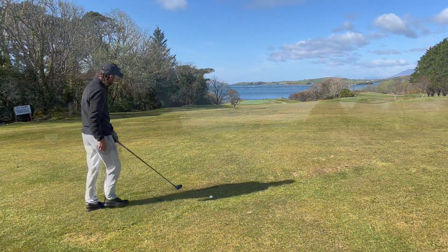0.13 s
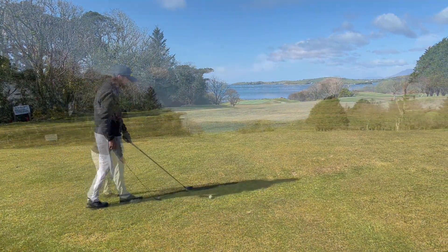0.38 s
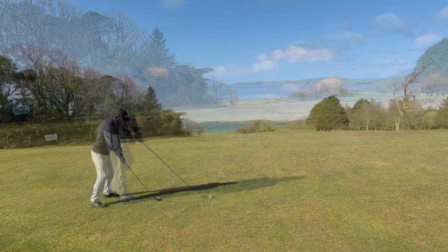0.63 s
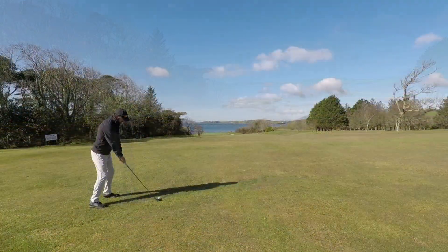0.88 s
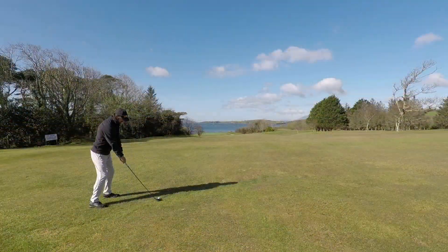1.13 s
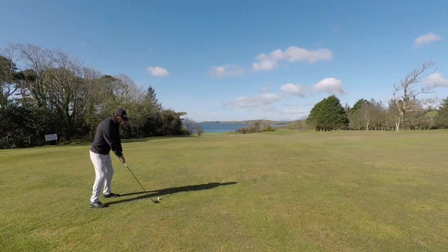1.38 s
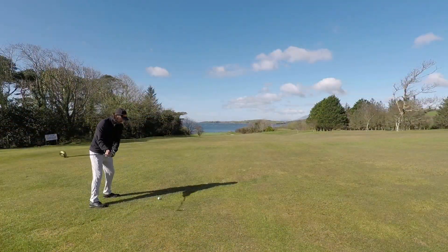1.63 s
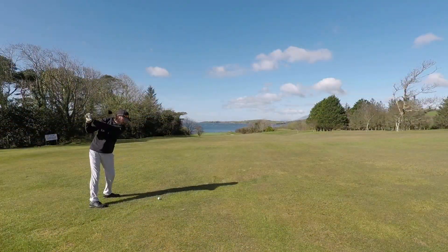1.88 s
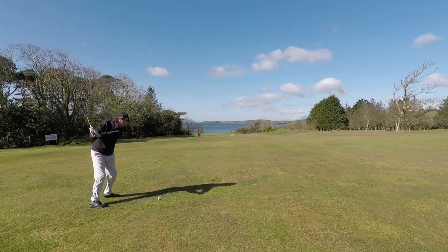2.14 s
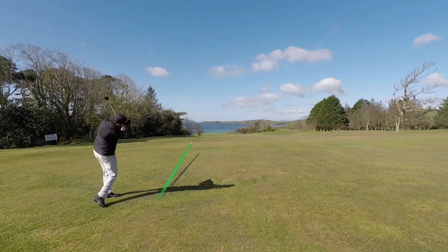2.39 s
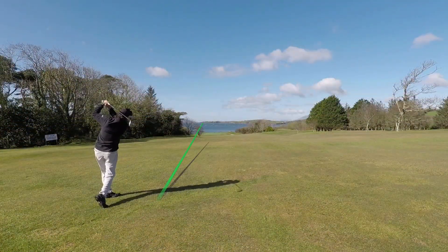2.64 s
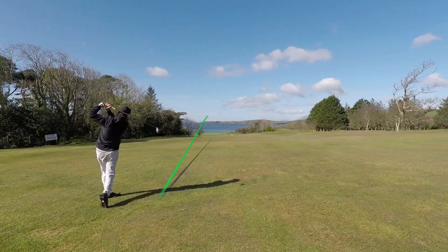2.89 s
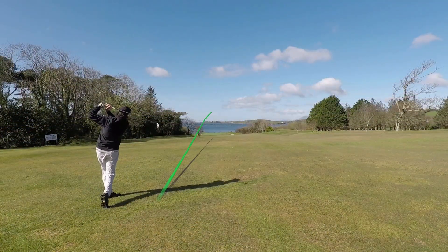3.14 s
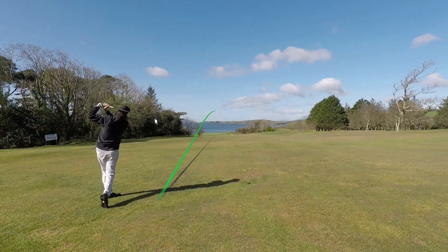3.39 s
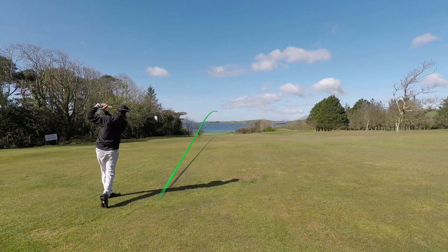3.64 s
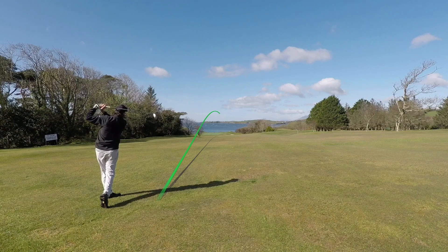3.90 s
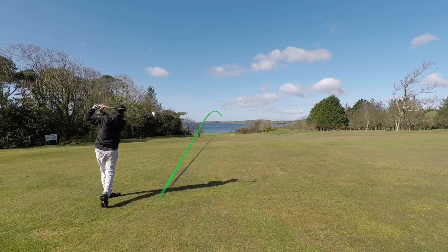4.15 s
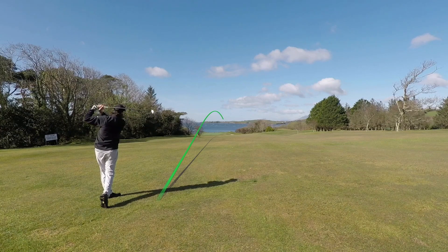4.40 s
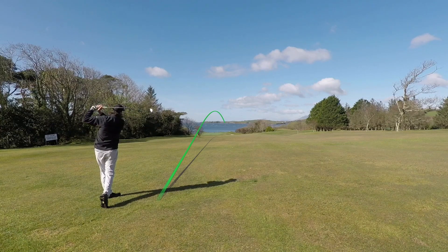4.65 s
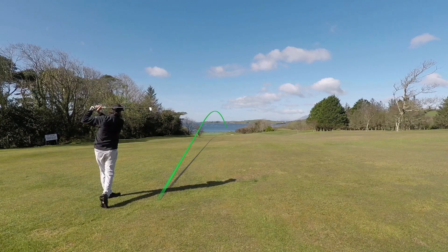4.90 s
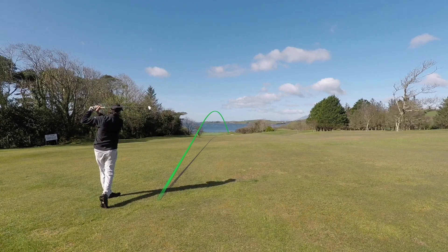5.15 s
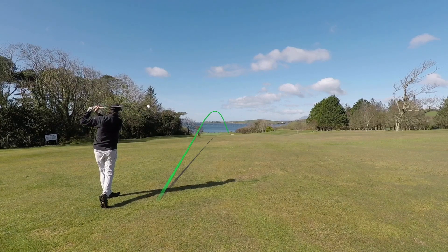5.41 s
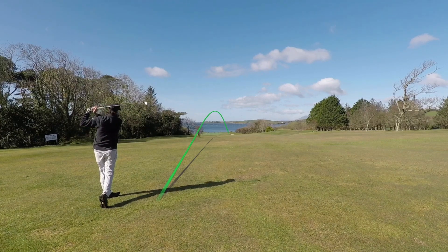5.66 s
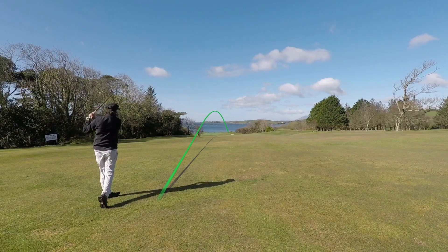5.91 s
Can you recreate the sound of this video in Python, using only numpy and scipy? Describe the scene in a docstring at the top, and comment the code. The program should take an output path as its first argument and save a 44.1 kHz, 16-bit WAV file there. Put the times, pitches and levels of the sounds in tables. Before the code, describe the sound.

Outdoors on open grass, a faint hiss of far water and leaves fades in over low rumble. Wind bumps the close stereo microphone with a blunt thud and short low flutters. A club swishes down and hits a ball with one very short, bright metallic crack, followed by a soft follow-through whoosh and tiny ticks. Later a distant bird chirps, a second wind thump lands, and the bird returns.

```python
"""Golf swing on windy open grass

A club swishes down and strikes a ball a few metres from a small stereo camera: shaped noise, then ringing modes.
Pressure steps shove its microphone twice, short low tone bursts ripple and buffet; strong bass opens a low cut
that slowly closes. Shaped noise makes the far water and leaves, which fade in over a low rumble and a hum;
gliding sines make a small bird far off."""
import sys
import numpy as np
from scipy import signal
from scipy.fft import rfft, irfft, next_fast_len
from scipy.io import wavfile
from scipy.ndimage import uniform_filter1d, map_coordinates

SR = 44100
rng = np.random.default_rng(int(sys.argv[2]) if len(sys.argv) > 2 else 0)


def amplitude_ratio(level_db):
    """Convert a level in decibels to the matching linear amplitude (field) ratio."""
    exponent = np.asarray(level_db, float) / 20
    return 10 ** exponent


def pcm_store(signal):
    """Save signal as 16-bit PCM."""
    levels = np.round(np.clip(np.atleast_2d(signal), -1, 1) * 32767)
    wavfile.write(sys.argv[1], SR, levels.astype(np.int16).T)


N = 266055
T = np.arange(N) / SR
STRIKE_S = 2.3513

# noise of head, grass and ticks: freq_hz [Hz], shape_db [relative dB per Hz]
SWISH_SPECTRUM = [(600, -33.5), (1500, -2), (3000, -6), (6500, -4.5), (9000, -11.5), (14000, -28.5),
                  (16000, -63)]
# wind shoves on the microphone: start_s [s], drop [pressure, share of full scale],
# return_s [s after the start], let_go_s [s after the start], last_swell [share of the drop]
WIND_SHOVES = [(1.6415, .68, .053, .080, .2), (4.8893, .88, .047, .0935, .43)]


def unit(x):
    """Scaled to rms 1."""
    return x / np.sqrt(np.mean(x ** 2) + 1e-20)


def along(points, hz):
    """Values of (Hz, value) points, read along a log axis."""
    f, v = np.transpose(points)
    return np.interp(np.log(hz + 1), np.log(f + 1), v)


def wobble(rate):
    """A smooth random curve, rate knots a second."""
    return map_coordinates(rng.standard_normal(int(N * rate / SR) + 4), [T * rate])


def swell(peak_s, level_db, ten_db_down_s):
    """A bell-shaped level in dB, 10 dB down at the given time either side of its peak."""
    return level_db - 10 * ((T - peak_s) / ten_db_down_s) ** 2


def decay(start_s, level_db, t60_s):
    """Amplitude that holds until start_s, then dies by 60 dB in t60_s."""
    return amplitude_ratio(level_db - 60 * np.maximum(T - start_s, 0) / t60_s)


def filtered(x, response):
    """x times a complex response of frequency."""
    m = next_fast_len(N + SR // 2)
    return irfft(rfft(x, m) * response(np.fft.rfftfreq(m, 1 / SR)), m)[..., :N]


def rush(spectrum, patchy_db):
    """Stereo noise with patches of random gain; the mid has rms 1."""
    # likeness of the ports: freq_hz [Hz], likeness [correlation, limited below]
    likeness = [(60, 0.84), (120, 0.29), (240, -0.21), (480, -0.61), (950, -0.83), (1890, -0.27),
                (3770, 0.12), (7520, 0.92), (15000, 0.95)]
    z = signal.stft(rng.standard_normal((2, N)), nperseg=512)[2]
    field = uniform_filter1d(rng.standard_normal(z.shape[1:]), size=6, axis=0)
    field = uniform_filter1d(field, size=14, axis=1)
    pair = signal.istft(z * amplitude_ratio(patchy_db * unit(field)), nperseg=512)[1][:, :N]

    def mid_and_side(hz):
        side_share = np.tan(np.arccos(np.clip(along(likeness, hz), -.9, .99)) / 2)
        return amplitude_ratio(along(spectrum, hz)) * [hz ** 0, side_share]

    mid, side = filtered(pair, mid_and_side)
    return np.array([mid + side, mid - side]) / np.std(mid)


def eddies():
    """Random stereo swing of rms 1, partly shared by the ports, that broadens a tone into a whistle."""
    return unit(np.array([wobble(750), wobble(750)]) + 1.2 * wobble(750))


def air():
    """Deep rumble, a far mains hum, the low rush of wind and the smooth hiss of far water and leaves."""
    # spectra of rumble, low wind and far hiss: freq_hz [Hz], shape_db [relative dB per Hz]
    rumble_spectrum = [(4, -20), (12, 1.5), (28, 1.5), (50, -2), (90, -4), (130, -16), (165, -24),
                       (220, -62), (400, -120)]
    wind_spectrum = [(71, -17.5), (120, 2), (183, -1.5), (246, -5), (350, -9.5), (900, -24), (1170, -48.5),
                     (1980, -120)]
    far_spectrum = [(240, -29.5), (400, -6), (742, -7), (801, -7), (1490, -8.5), (1600, -8.5),
                    (2090, -12.5), (5270, -20), (7280, -15), (9920, -16), (14800, -28.5), (16000, -48.5)]
    # low wind before its small random wavering: time_s [s], level_db [dB rms of the mid]
    wind_level = [(0, -51.5), (1.0, -55.5), (1.35, -52.5), (2.3, -50.5), (2.55, -54), (6.03, -54)]
    # hum before its wavering: freq_hz [Hz], level_db [dB rms]
    hum_tones = [(59.9, -46.5), (120, -63)]
    fade_s, fade_power, floor = 0.76, 1.78, amplitude_ratio(-24.5)
    fade = np.clip(T / fade_s, 0, 1) ** fade_power * (1 - floor) + floor
    rumble = amplitude_ratio(-48.5 + 1.0 * wobble(8.4)) * rush(rumble_spectrum, patchy_db=1)
    hum = 0
    for hz, db in hum_tones:
        level = np.sqrt(2) * amplitude_ratio(db + 3 * wobble(10))
        hum = hum + level * np.sin(2 * np.pi * hz * T + 0.7 * wobble(6))
    low_db = np.interp(T, *np.transpose(wind_level))
    low = amplitude_ratio(low_db + 0.75 * wobble(4.46)) * rush(wind_spectrum, patchy_db=1)
    far = amplitude_ratio(-58) * rush(far_spectrum, patchy_db=0.5)
    # a band near 900 Hz dies away from the start
    band = [(400, -20), (550, -7), (850, -3.5), (1100, -4.5), (1800, -15), (2400, -47)]
    fading = amplitude_ratio(-68.5 - 14 * T) * rush(band, patchy_db=1.0)
    return np.clip(T / 0.024, 0, 1) * (rumble + hum) + fading + fade * (low + far)


def brief_hiss():
    """A short narrow hiss: a high tone broadened by random swings in level."""
    level = np.sqrt(2) * amplitude_ratio(swell(peak_s=0.68, level_db=-65, ten_db_down_s=.05))
    return level * eddies() * np.sin(2 * np.pi * 6540 * T)


def low_bursts():
    """A faint low ripple just before the first shove, then short low bursts: rough tones under bells."""
    # bursts: time_s [s], level_db [dB peak of the smooth part before panning], freq_hz [Hz], length_s [s]
    burst_rows = [(1.608, -29, 202, 0.022), (1.953, -27, 300, 0.0086), (1.964, -14, 171, 0.013),
                  (1.981, -19, 205, 0.023), (2.022, -30.5, 177, 0.044), (2.159, -24.5, 120, 0.046),
                  (2.18, -20, 134, 0.014), (2.196, -20, 165, 0.02), (2.283, -37, 250, 0.017),
                  (2.33, -25.5, 194, 0.015)]
    edge = [(150, -18.0), (300, 13), (600, -7.5), (1100, -25.0), (2000, -58.5)]  # (Hz, relative dB per Hz)
    rough = amplitude_ratio(-21.5) * rush(edge, patchy_db=3.5)[0]
    out = 0
    for s, db, hz, length in burst_rows:
        phase = rng.uniform(-0.66, 0.45)
        bell = np.exp(-(3.54 * (T - s) / length) ** 2)
        out = out + amplitude_ratio(db) * bell * (np.cos(2 * np.pi * hz * (T - s) + phase) + rough)
    return out * [[1], [-.18]]  # a little, inverted, in the second channel


def shoves():
    """Pressure steps leak away behind the diaphragm; the right port feels them first, the cover flaps."""
    # steps as a shove lets go: delay_s [s], share [of the pressure regained], rise_s [s]
    letting_go = [(0, -.24, .0012), (.0025, .1, .002), (.0065, -.5, .005)]
    # the port cover flutters on: start_s [s], level_db [dB peak], freq_hz [Hz]
    flutters = [(1.655, -22, 200), (4.9052, -14.5, 149)]
    return_share = .44
    steps = []  # (s, size, rise s)
    flaps = [(s, db, hz, 0.068, -52) for s, db, hz in flutters]  # (s, flap dB, Hz, t60 s, rustle dB)
    for s, drop, back, held, last in WIND_SHOVES:
        end = s + held
        steps += [(s, -drop, .001), (s + back, drop * return_share, .016)]
        steps += [(end - .010, drop * last, .014)]  # the last swell
        regained = drop * (return_share + last)
        steps += [(end + lag, regained * share, rise) for lag, share, rise in letting_go]
        flaps += [(s + .002, -10, 140, .02, -37), (end - .011, -34, 250, .03, -46)]
    push = sum(size * (.5 + .5 * np.tanh(2 * (T - s) / rise)) for s, size, rise in steps)

    def leak(hz):
        # a 22 ms leak applied to the slope of the push; the left port lags by 0.4 ms
        lag = np.exp(-2j * np.pi * hz * np.array([[.0004], [0]]))
        return SR * lag / (1 / .022 + 2j * np.pi * hz)

    pressure = filtered(np.diff(push, prepend=0), leak)
    # the ports snap as a shove lands, the right one hardest
    snap = sum(amplitude_ratio(-9.5) * np.exp(-((T - s + 0.00028) / .00014) ** 2) for s, *_ in WIND_SHOVES)
    flap, rustle_level = 0, 0
    for s, db, hz, t60, rustle_db in flaps:
        tone = np.sin(2 * np.pi * hz * (T - s))
        flap = flap + decay(s, db, t60) * tone * np.clip((T - s) / 0.0004, 0, 1)
        rustle_level = rustle_level + decay(s, rustle_db, 0.082) * np.clip((T - s) / 0.0012, 0, 1)
    cloth = [(150, -11), (350, 0), (1500, -6.5), (3500, -21.0), (6000, -57), (9000, -90)]  # (Hz, dB per Hz)
    rustle = rustle_level * rush(cloth, patchy_db=1.0)
    return pressure + snap * [[.1], [1]] + flap + rustle


def sway():
    """The camera mount rings low and long once a shove lets go, by a share of its last swell."""
    out = 0
    for s, drop, _, held, last in WIND_SHOVES:
        t = np.maximum(T - s - held, 0)
        level = .045 * drop * last * amplitude_ratio(-60 * t / 17 + 1.0 * wobble(6))
        out = out + level * np.sin(2 * np.pi * 23.15 * t)
    return out


def ticks():
    """Bits of turf and clothing tick: bursts of noise that start at once and die fast."""
    # ticks: time_s [s], level_db [dB at the onset, before the 0.44 below]
    tick_rows = [(1.829, -42), (2.475, -47), (2.523, -40.5), (2.6994, -52)]
    level = sum(decay(s, db, 0.018) * (T >= s) for s, db in tick_rows)
    return 0.44 * level * rush(SWISH_SPECTRUM, patchy_db=0)


def swing():
    """The shaft sheds eddies in a broad whistle that rises with speed; head and grass hiss."""
    downswing_s, top_whistle_hz, follow_hz = .18, 890, 1440
    since = T - STRIKE_S
    speed = np.clip(1 + since / downswing_s, 1e-3, 1)  # gathers evenly up to full speed at the blow
    hz = np.where(since < 0, top_whistle_hz * speed, follow_hz)
    level = amplitude_ratio(swell(peak_s=2.31, level_db=-46.5, ten_db_down_s=.04))
    level = level + amplitude_ratio(swell(peak_s=2.67, level_db=-64.5, ten_db_down_s=.15))  # follow-through
    whistle = np.sqrt(2) * level * eddies() * np.sin(2 * np.pi * np.cumsum(hz) / SR)
    # the hiss grows 42.5 dB per decade of speed and falls 702 dB a second after the blow
    hiss = amplitude_ratio(-48 + 42.5 * np.log10(speed) - 702 * np.maximum(since, 0))
    hiss = hiss + amplitude_ratio(swell(peak_s=2.593, level_db=-58, ten_db_down_s=0.17))  # follow-through
    return whistle + hiss * rush(SWISH_SPECTRUM, patchy_db=0)


def strike():
    """The blow rings the modes of head and ball; turf, player and surroundings answer at once."""
    # club head and ball: freq_hz [Hz], level_db [dB before the gain of the blow], t60_s [s],
    # pan_db [dB left over right], left_lead_rad [radians left ahead of right]
    head_modes = [(300, -27.5, 0.0275, 9, 3.5), (756, -12, 0.0052, 9.5, 4), (1340, -13, 0.0067, -10, 2.5),
                  (1625, -2.5, 0.0076, -9.5, 1), (1910, -6, 0.0076, 11.5, -1), (2225, -12, 0.0097, 2, 3),
                  (2580, -15.5, 0.012, 6.5, 3.5), (4100, -16.5, 0.016, 0, 1.43),
                  (4650, -26.5, 0.0067, 0, 4.5), (5100, -21.5, 0.021, 5, 3), (5950, -5.5, 0.022, 0, 0.33),
                  (5880, -20.5, 0.041, -4, 0.7), (6040, -24, 0.077, 0.5, -1.5), (6250, -15.5, .012, -2, 3),
                  (6560, -15, 0.048, 8.5, 1.65), (6650, -29, 0.04, 1.5, 0), (7060, -21.5, 0.043, -4.5, 1.5),
                  (7950, -21.5, 0.035, 4, 0.5), (8230, -23, 0.0253, -3, 0.5), (8550, -11.5, .02, -2, 3.5),
                  (10500, -19.5, 0.015, -7, 4.5), (13350, -22.5, 0.0079, -8, -0.5)]
    # off the turf and the player: delay_s [s], level_db [dB relative to the direct sound]
    bounces = [(.0027, -20), (.0042, -18)]
    # scatter around the tee: freq_hz [Hz], t60_s [s]
    scatter_t60 = [(300, 0.031), (2000, 0.028), (8000, 0.07), (15000, 0.037)]
    first = int(STRIKE_S * SR) + 1
    t = T[first:first + SR // 4] - STRIKE_S
    ear = np.array([[.5], [-.5]])  # left, right
    ring = 0
    for hz, db, t60, pan_db, lead in head_modes:
        level = amplitude_ratio(db + ear * pan_db - 60 * t / t60)
        ring = ring - level * np.sin(2 * np.pi * hz * t + ear * lead)
    crack_spectrum = [(500, -21), (3000, 4.5), (9000, 0.0), (15000, -22), (16500, -60)]  # (Hz, dB per Hz)
    crack = amplitude_ratio(-17.5 - 60 * t / 0.015) * rush(crack_spectrum, patchy_db=-4.0)[:, :len(t)]
    direct = amplitude_ratio(-2.14) * (ring + crack) * (1 - np.exp(-t / 0.00018))
    near = direct + sum(amplitude_ratio(db) * np.roll(direct, round(lag * SR), axis=1) for lag, db in bounces)
    # scattered tail: noise that dies at its own pace in each band
    hz, u, z = signal.stft(rng.standard_normal((2, SR // 4)), SR, nperseg=128)
    tail = signal.istft(z * amplitude_ratio(-60 * u / along(scatter_t60, hz)[:, None]), SR, nperseg=128)[1]
    tail = tail / np.linalg.norm(tail[0])
    near = near + amplitude_ratio(-13) * signal.fftconvolve(direct, tail, axes=1)[:, :len(t)]
    return np.pad(near, ((0, 0), (first, N - first - len(t))))


def bird():
    """Short gliding whistles and one warble, far off and smeared by the trees."""
    # clear notes: start_s [s], length_s [s], from_hz [Hz], to_hz [Hz], level_db [dB peak before panning]
    clear_notes = [(4.139, .025, 3780, 3580, -58), (4.213, .022, 3600, 3300, -60),
                   (4.26, .026, 3300, 4050, -54), (4.37, 0.028, 4100, 3280, -58),
                   (4.478, 0.023, 3350, 3040, -58), (4.544, .035, 3980, 3680, -55.5),
                   (5.378, .022, 3900, 3580, -57), (5.41, 0.041, 3720, 3890, -57),
                   (5.543, .027, 3420, 3050, -53.5), (5.582, .042, 3100, 2980, -62),
                   (5.645, 0.023, 3680, 3500, -56), (5.695, .029, 3400, 3290, -61),
                   (5.752, .035, 3400, 3400, -59), (4.183, .025, 3750, 3650, -63),
                   (4.293, .023, 2970, 2950, -62), (5.507, .035, 3800, 3740, -62)]
    # phrases filled with faint notes: from_s [s], to_s [s]
    phrases = [(4.15, 4.6), (5.4, 5.9)]
    notes = [(*note, 0) for note in clear_notes]  # last column: warble depth in Hz
    for start, end in phrases:
        for when, pitch, fall in rng.random((4, 3)):
            hz = 2950 + (4100 - 2950) * pitch
            notes.append((start + (end - start) * when, .027, hz, hz * (1 - .06 * fall), -63, 0))
    notes.append((5.4, .125, 3170, 2988, -56.5, 110))  # the long wavering note
    warble_hz = 20
    out = np.zeros(N)
    for s, length, from_hz, to_hz, db, depth_hz in notes:
        t = np.linspace(0, length, round(length * SR))
        hz = from_hz + (to_hz - from_hz) * t / length - depth_hz * np.cos(2 * np.pi * warble_hz * t)
        note = amplitude_ratio(db) * np.sin(np.pi * t / length) * np.sin(2 * np.pi * np.cumsum(hz) / SR)
        out[round(s * SR):][:len(t)] += note
    trees = rng.standard_normal((2, SR // 4)) * amplitude_ratio(-60 * T[:SR // 4] / .2)
    echo = signal.fftconvolve(out[None], trees / np.linalg.norm(trees[0]), axes=1)[:, :N]
    return out * [[.9], [.5]] + amplitude_ratio(-5) * echo


def scene():
    """All sources at the two ports."""
    return air() + brief_hiss() + low_bursts() + shoves() + sway() + ticks() + swing() + strike() + bird()


def roll_off(x):
    """The treble ends steeply here."""
    return signal.sosfilt(signal.butter(12, 16570, fs=SR, output="sos"), x)


def record(dry):
    """A steep low cut without delay, ringing before a step; strong bass trips it open, then it slowly closes."""
    trip_level, last_trip_s = .25, -1.88  # it starts as if tripped before the start
    hold_s, close_db_per_s, closed_db = 1.0, 10.5, -24
    wait_s, opens_s = .028, .021
    low = filtered(dry, lambda hz: .5 - .5 * np.tanh((hz - 138) / 7))
    tripped = np.where(np.abs(low).max(axis=0) > trip_level, T, last_trip_s)
    tripped = np.maximum.accumulate(tripped)  # time of the latest trip
    passed = amplitude_ratio(np.clip(-close_db_per_s * (T - tripped - hold_s), closed_db, 0))
    passed = np.interp(T - wait_s, T, passed)
    passed = uniform_filter1d(passed, size=round(opens_s * SR))
    mix = dry - low + passed * low
    return roll_off(mix)


dry = scene()
out = record(dry)
pcm_store(out)
```